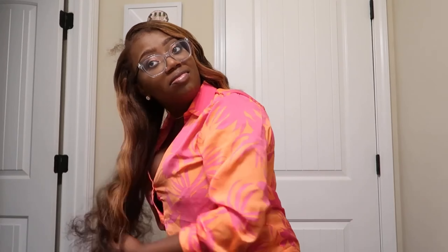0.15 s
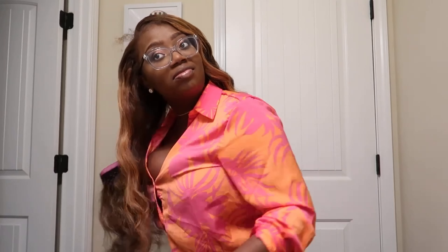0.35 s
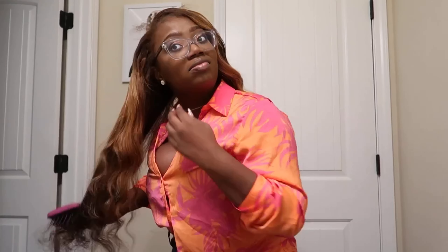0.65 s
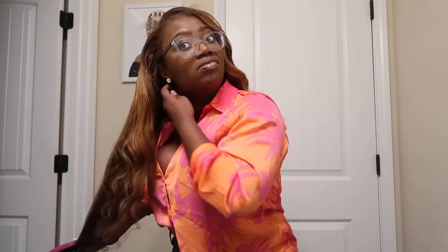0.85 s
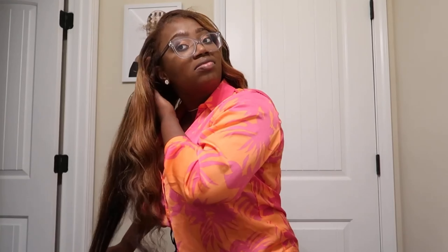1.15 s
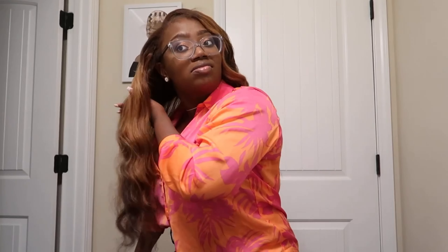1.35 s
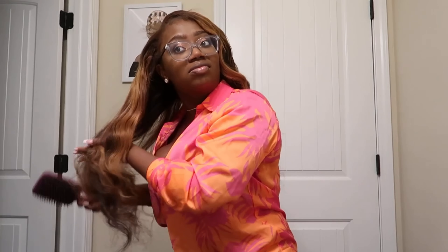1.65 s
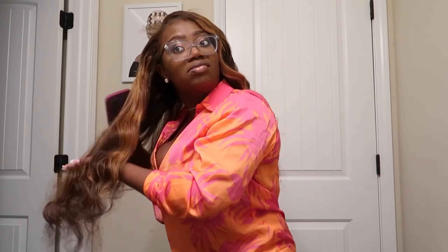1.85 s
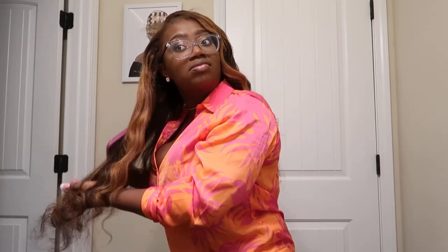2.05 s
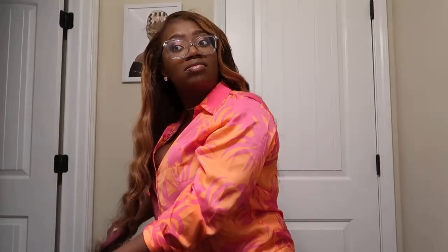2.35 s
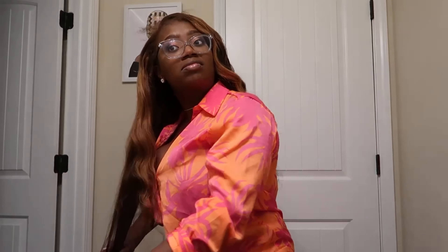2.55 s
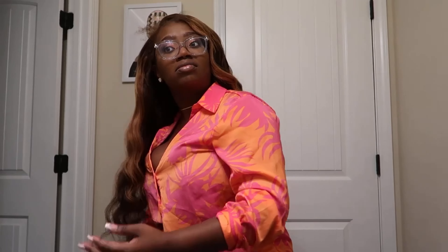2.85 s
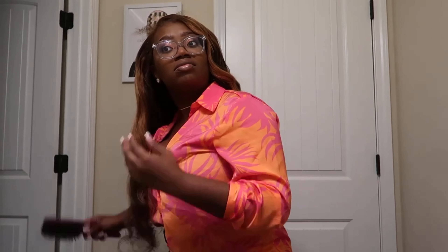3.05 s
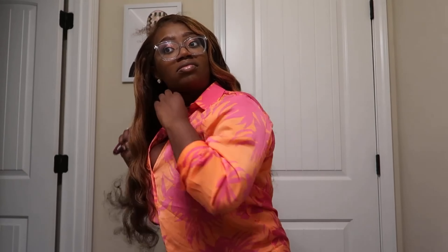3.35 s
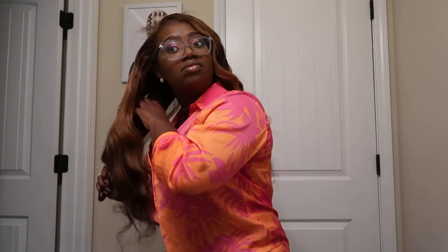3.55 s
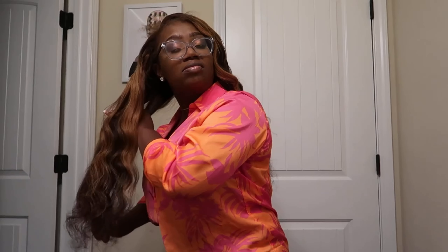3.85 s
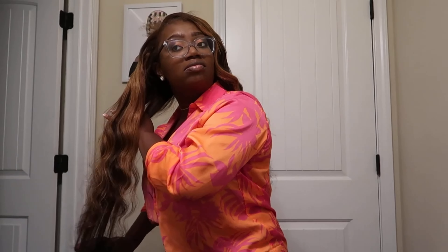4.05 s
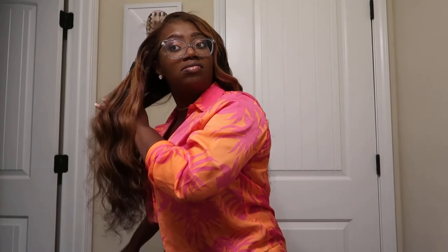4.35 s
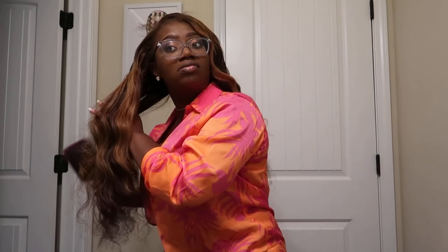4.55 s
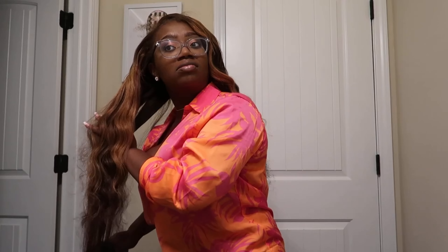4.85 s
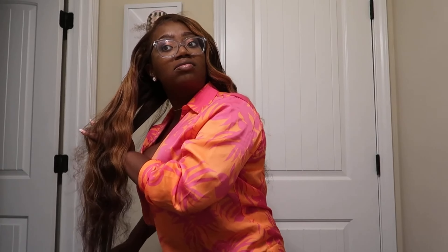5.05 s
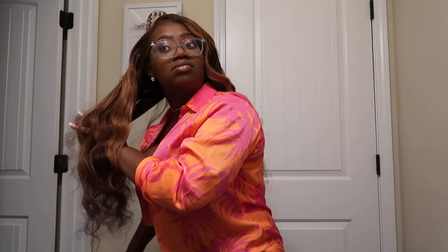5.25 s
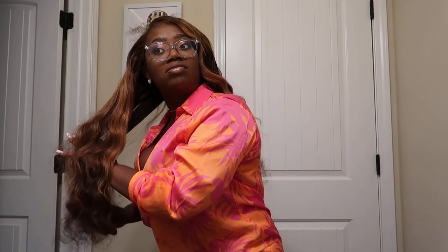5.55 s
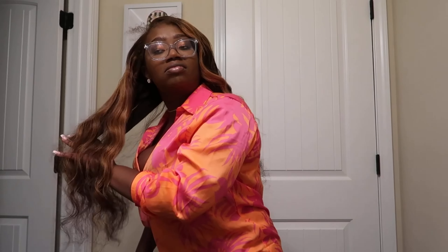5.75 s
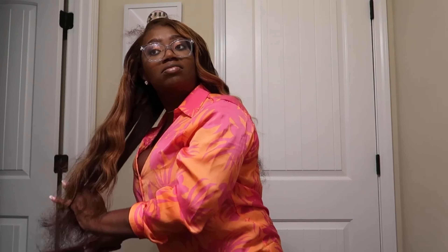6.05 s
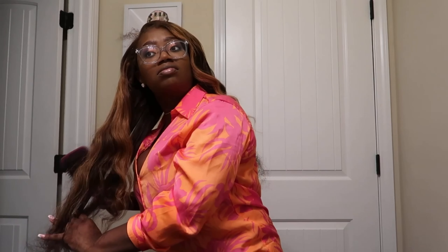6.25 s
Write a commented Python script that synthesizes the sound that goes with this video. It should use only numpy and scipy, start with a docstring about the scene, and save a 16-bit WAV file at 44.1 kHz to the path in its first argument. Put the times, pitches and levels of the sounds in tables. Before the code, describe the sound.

A small, quiet indoor room with low rumble and faint hiss, miked fairly close. At 0.0 s a paddle brush slides through long hair for about 0.7 s: a soft hollow rub, slightly sinking in pitch, under fine dry rasp. Small snags tick at 0.55-0.8 s, then light rustling. At 1.1-1.4 s tangles catch, with a loud, thumpy, crunchy knock at 1.3 s and sharp bristle flicks. Faint rustles lead to a softer stroke at 1.9-2.5 s, ending in a run of woody clacks and scratches until 2.85 s. After a quiet pause, a third gentle stroke starts at 3.35 s and breaks into hollow knocks at 3.9-4.25 s. A shorter fourth pull at 4.7 s snags repeatedly, peaking at 5.15 s with a hard knock, bright tip swish and tiny hair cracks. Brief soft brush touches at 5.6 and 6.35 s, with slight rustles, finish it.

```python
"""Over low room rumble and faint hiss, a paddle brush is pulled through long hair in a small quiet room.
Strands slip over the bristles with a fine rasp and stir a hollow ring and the brush's soft cushion.
During and after the four main strokes the brush snags: bristles flick back, tangles knock in decaying
resonances, and at times the tips swish. Light rustles fill the pauses, and two brief touches of the
brush close the scene."""
import sys
import numpy as np
from scipy import signal
from scipy.fft import rfft, irfft
from scipy.io import wavfile

SR = 44100
rng = np.random.default_rng(int(sys.argv[2]) if len(sys.argv) > 2 else 0)


def put_to_file(sound):
    """Save the sound as 16-bit audio at rate SR, in the file named by the first command-line argument."""
    columns = np.atleast_2d(sound).T  # one column per channel
    safe = np.clip(columns, -1, 1)
    whole_steps = np.round(safe * 32767)
    wavfile.write(sys.argv[1], SR, whole_steps.astype(np.int16))


N = 282240
HZ = np.fft.rfftfreq(N, 1 / SR)
T = np.arange(N) / SR

# Still air of the room and microphone hiss. Each row: frequency in Hz, relative density in dB per Hz.
AIR_SPECTRUM = [(15, -20), (38, -1.5), (60, -7), (115, 3), (180, -7.5), (280, -6), (450, -11.5), (750, -16),
                (1500, -21), (4000, -26.5), (8000, -34.5), (11500, -36.5), (13500, -41), (15500, -52)]
# Likeness of the air on the two sides. Each row: frequency in Hz, left-right likeness (clipped to -1..1).
AIR_LIKENESS = [(60, 1), (130, 0.96), (290, -0.12), (640, -0.38), (8000, 0.23), (13000, -1.23)]
AIR_DB = -50  # rms over both sides

# Strokes down the hair. Each row: start in s, length in s, time to sink in in s, hollow ring in dB,
# hair's rasp in dB, easing once sunk in in dB, cushion's share of the power 0-1 (before it fades).
BRUSH_STROKES = [(0.029, 0.68, 0.096, -39.5, -49, 5.5, 0.76), (1.879, 0.64, 0.19, -45, -53, 0, 0.9),
                 (3.346, 0.68, 0.077, -44, -53, -0.5, 0.57), (4.696, 0.37, 0.021, -41.5, -50.5, 8, 0.1),
                 (5.565, 0.073, 0.083, -38.5, -49.5, 0, 0.7), (6.36, .1, 0.019, -46, -56, 1, 0.06)]
# The pull holds, eases as the hair straightens, and ends as the brush lifts.
EASE_AFTER_S, EASE_S, LIFT_S = 0.12, 0.17, 0.067
# The cushion's hollow rub sinks in pitch and fades along each stroke.
CUSHION_HZ, SINK_OCT_PER_S, CUSHION_FADE_S = 479, 0.31, 0.78
RASP_SLOWER = 1.19  # the rasp builds this many times longer than the ring, as more strands enter
# Bristles catching in a tangle and tearing through. Each row: start in s, length in s,
# hollow ring in dB, hair's rasp in dB, extra thump in dB, extra clack in dB.
TANGLE_SNAGS = [(0.556, 0.053, -40.5, -49, 1, -2), (0.704, 0.046, -33.5, -45, -8, 0.5),
                (0.763, 0.054, -46, -47, 11, -0.5), (1.086, 0.037, -46.5, -52.5, -5, 4.5),
                (1.16, 0.06, -33.5, -38.5, 2, 3), (1.245, 0.032, -46, -44, 2, -13),
                (1.285, 0.031, -29.5, -30.5, 12.5, 8), (1.32, 0.036, -42.5, -45.5, 6, 9),
                (2.122, 0.11, -45.5, -52.5, -5, 2.5), (2.588, 0.028, -41.5, -42.5, 7, 8),
                (2.635, 0.056, -42.5, -41, 2, 3), (2.7, 0.051, -39, -41, -5, -2),
                (2.779, 0.03, -34, -32.5, -14, 7), (2.811, 0.021, -35.5, -34, 0, 9),
                (2.836, 0.042, -49, -42.5, 11, 8), (3.867, 0.038, -37, -54, -2, -8.5),
                (3.979, 0.055, -32.5, -45.5, -9, -5), (4.032, 0.031, -31.5, -37, 1, 1),
                (4.138, 0.052, -29, -39, 2.5, 1.5), (4.174, 0.047, -28, -33.5, -1.5, 4),
                (4.702, 0.03, -37, -55, -11, -1), (4.859, 0.069, -39.5, -41.5, 4, 2),
                (4.946, 0.033, -33.5, -38.5, 3, 3.5), (5.005, 0.026, -36.5, -44, -10, 7),
                (5.058, 0.026, -42.5, -43.5, 6, 12.5), (5.129, 0.047, -27, -34.5, -6, 3)]
CATCH_S, LET_GO_S = 0.0098, 0.0076  # rise and dying away of a snag
# Hair gathered and shifted lightly between strokes. Each row: start in s, length in s,
# dull rustle in dB, rasp in dB.
HAIR_RUSTLES = [(.82, 0.3, -54.5, -56.5), (1.42, 0.09, -54, -63), (1.55, 0.18, -81, -58),
                (2.93, 0.11, -57, -78), (5.66, 0.038, -59, -49), (6.19, 0.094, -55.5, -60)]
RUSTLE_RISE_S, RUSTLE_FADE_S = 0.021, 0.013
# The hair never lies quite still. One row: dull rustle in dB, rasp in dB (before the friction dies away).
IDLE_HAIR_DB = [-59, -62]

# Resonances of the knocks and strokes, coloured by paddle and a close wall together.
# Each row: frequency in Hz, width in Hz, relative strength in dB.
BODY_MODES = [(153, 29, -5.5), (228.4, 22.3, 1.5), (299.3, 18.7, -3), (372.5, 34, 0.5), (401.6, 39, 0.5),
              (465.5, 25, -1.5), (507.2, 33.4, -5), (573, 59, -9.5), (674, 36, -5.5), (745.4, 18.5, -2.5),
              (826, 26, -9.5), (883, 21.5, -10), (952, 77, -14), (1048, 30, -17.5), (1165, 78, -25),
              (1340, 30, -20.5), (1472, 14, -25.5)]
# Hair sliding over bristles. Each row: frequency in Hz, relative density in dB per Hz.
RASP_SPECTRUM = [(150, 7), (500, 6.5), (1000, 3.5), (1600, 1), (2400, 2.5), (3700, -1.5), (4600, -5),
                 (5600, -4.5), (7000, -12), (9000, -15), (11500, -12.5), (13500, -44)]
# Silky hiss of strand on strand. Each row: frequency in Hz, relative density in dB per Hz.
SILK_SPECTRUM = [(2000, -22), (4500, -7), (6000, -5), (7500, -9), (9000, -6), (11600, 0), (13000, -5),
                 (15000, -12)]

# Single bristles flicking back. Each row: start in s, relative peak in dB.
BRISTLE_FLICKS = [(.184, -29), (.5761, -38), (.675, -32.5), (.7143, -29), (1.088, -41), (1.156, -34),
                  (1.1707, -31), (1.18, -35), (1.2825, -19.5), (1.2955, -27), (1.301, -22.5), (2.0098, -39),
                  (2.593, -33), (2.632, -42), (2.7025, -30), (2.7931, -25), (2.81, -17), (3.9935, -29),
                  (4.0244, -23), (4.038, -26), (4.14, -31), (4.148, -24), (4.158, -25), (4.1675, -20),
                  (4.221, -27), (4.8765, -29), (4.891, -30), (4.9005, -23), (4.953, -32), (4.964, -39),
                  (5.022, -42), (5.0615, -27), (5.1387, -40)]
# Snap of one bristle. Each row: frequency in Hz, relative density in dB per Hz.
SNAP_SPECTRUM = [(200, -39), (1200, 13), (2400, 17.5), (3600, 11.5), (4700, -21), (8000, -2), (12000, -30),
                 (15000, -23)]
# Single hairs breaking with a tiny bright crack. Each row: start in s, peak in dB.
HAIR_BREAKS = [(4.024, -29), (5.138, -22), (5.149, -17)]
# Knocks as tangles let go, some followed closely by their echo off a wall. Each row: start in s,
# relative peak in dB, low thump over the ring in dB, hard clack over the ring in dB,
# favoured frequency in Hz.
KNOCK_EVENTS = [(.67, -24.5, 1, -15, 398), (.713, -27.5, 6, -3, 706), (1.151, -25, -5, 0, 895),
                (1.167, -22, 1, 4.5, 302), (1.293, -8.5, 12.5, 6, 150), (1.307, -7.5, 9.5, 4, 400),
                (1.343, -26, 8, 10, 302), (1.359, -24, 10, 0, 640), (1.371, -22, 13, 6, 160),
                (2.551, -26.5, -6, -4, 390), (2.590, -23, 0, -8, 400), (2.631, -17.5, 3, 3, 400),
                (2.644, -15, 12, 15, 825), (2.702, -12, 0, -17, 400), (2.716, -13.5, 4, 0.5, 805),
                (2.766, -15, 0, 1.5, 400), (2.786, -18.5, 4, -2, 394), (4.035, -20, -20, 1, 620),
                (4.15, -31, -3, 7, 745), (4.181, -13.5, -7, -14, 400), (4.209, -17, -4, 10, 940),
                (4.785, -24, -12, -20, 394), (4.897, -13, -16, -13, 515), (4.914, -22.5, 18, -2, 159),
                (5.008, -18.5, -4, -12, 413), (5.134, -31, -14, 9, 520), (5.147, -7.5, -6, -4.5, 443)]
# Tips of the hair whipping off the bristles. Each row: start in s, length in s, level in dB.
TIP_WHISKS = [(0.713, 0.047, -50), (2.72, 0.042, -50), (5.063, 0.023, -43), (5.136, 0.039, -36)]
# Colour of that swish. Each row: frequency in Hz, relative density in dB per Hz.
WHISK_SPECTRUM = [(1000, -31), (2600, -12), (3900, 10), (5400, 4), (7000, -13), (9000, -8), (12000, -6),
                  (15000, -21)]

# Reverberation time. Each row: frequency in Hz, time to fall by 60 dB in s.
ROOM_DECAY = [(100, 0.19), (400, 0.32), (1000, 0.37), (4000, 0.33), (12000, 0.26)]
# The two microphone ports. Each row: frequency in Hz, likeness 0-1, phase lead of the left in radians.
PORT_COHERENCE = [(100, .99, 0), (750, .985, .03), (1300, .9, .05), (2400, .91, .15), (3500, .74, .35),
                  (4500, .45, .8), (5800, .45, 2.0), (7700, .35, 1.5), (8800, .72, 3.0), (10200, .7, 3.0),
                  (12500, .98, 3.1)]
EDGE_HZ = 15300  # upper band limit of the recorder


def amp(db):
    """Decibels express a logarithmic amplitude ratio; this returns the ratio itself."""
    return 10 ** (np.asarray(db) / 20)


def read(points, hz, axis=1):
    """Interpolation: one column of a table, joined by straight lines over log frequency."""
    points = np.array(points, float)
    return np.interp(np.log(hz + 1), np.log(points[:, 0] + 1), points[:, axis])


def unit(x):
    """Normalization: scales a signal to rms 1."""
    return x / np.sqrt(np.mean(x ** 2) + 1e-20)


def add(mix, s, sound):
    """Superposition: lays a sound into the mix at s seconds."""
    part = mix[max(round(s * SR), 0):][:len(sound)]
    part += sound[:len(part)]


def colour(x, spectrum):
    """Minimum-phase filtering: folding the cepstrum makes the given spectrum causal."""
    cepstrum = irfft(np.log(amp(read(spectrum, HZ))), N)
    cepstrum[1:N // 2] *= 2
    cepstrum[N // 2 + 1:] = 0
    return irfft(rfft(x, N) * np.exp(rfft(cepstrum)), N)


def wander(hz):
    """Low-pass noise: slow chance of rms 1, up to about hz changes a second."""
    slow = rfft(rng.standard_normal(N)) / np.sqrt(1 + (HZ / hz) ** 4)
    return unit(irfft(slow, N))


def resonate(x, hz, width):
    """Swept resonance: shifts the curve hz to zero, smooths with a one-pole filter and shifts back."""
    turn = np.exp(2j * np.pi * np.cumsum(hz) / SR)
    r = np.exp(-np.pi * width / SR)
    return 2 * (turn * signal.lfilter([1 - r], [1, -r], x / turn)).real


def swell(start, length, rise_s, fade_s):
    """Envelope: rises smoothly, holds for the rest of the length and decays exponentially."""
    age = T - start
    rise = np.sin(np.pi / 2 * np.clip(age / rise_s, 0, 1)) ** 2
    return rise * np.exp(-np.clip((age - length) / fade_s, 0, 20))


def air():
    """Partial coherence: low room rumble common to both sides, under a faint hiss that is not."""
    left, other = rfft(rng.standard_normal((2, N)))
    same = np.clip(read(AIR_LIKENESS, HZ), -1, 1)
    right = same * left + np.sqrt(1 - same ** 2) * other
    pair = np.array([left, right]) * amp(read(AIR_SPECTRUM, HZ))
    return amp(AIR_DB) * unit(irfft(pair, N))


def pull():
    """Addition of powers: idle hair, strokes, snags and rustles sum to the ring and rasp levels in dB.

    Also returns the cushion's pitch in Hz and its share of the power.
    """
    ring, rasp = amp(IDLE_HAIR_DB)[:, None] ** 2 * np.ones(N)
    cushion, hz = np.zeros(N), np.full(N, float(CUSHION_HZ))
    for start, length, sink_s, ring_db, rasp_db, ease_db, share in BRUSH_STROKES:
        age = np.clip(T - start, 0, length)
        easing = 1 - np.exp(-np.maximum(age - sink_s - EASE_AFTER_S, 0) / EASE_S)
        eased = amp(-ease_db * easing)
        power = (amp(ring_db) * eased * swell(start, length, sink_s, LIFT_S)) ** 2
        ring = ring + power
        rasp_gain = swell(start, length, sink_s * RASP_SLOWER, LIFT_S)
        rasp = rasp + (amp(rasp_db) * eased * rasp_gain) ** 2
        cushion = cushion + power * share * np.exp(-age / CUSHION_FADE_S)
        hz = np.where(T < start, hz, CUSHION_HZ * 2 ** (-SINK_OCT_PER_S * age))
    snags = (TANGLE_SNAGS, CATCH_S, LET_GO_S)
    rustles = (HAIR_RUSTLES, RUSTLE_RISE_S, RUSTLE_FADE_S)
    for events, rise_s, fade_s in (snags, rustles):
        for start, length, ring_db, rasp_db, *_ in events:
            power = swell(start, length, rise_s, fade_s) ** 2
            ring = ring + amp(ring_db) ** 2 * power
            rasp = rasp + amp(rasp_db) ** 2 * power
    return 10 * np.log10(ring), 10 * np.log10(rasp), hz, np.clip(cushion / ring, 0, 1)


def grip():
    """Point of excitation: each snag tugs another part, lifting thump and clack by its own dB."""
    return sum(np.outer([thump_db, clack_db], swell(start, length, CATCH_S, LET_GO_S))
               for start, length, _, _, thump_db, clack_db in TANGLE_SNAGS)


def slips(per_s, spread_db, smooth):
    """Stick-slip friction: clicks of uneven size and either sign over a smooth slide."""
    size = amp(spread_db * np.minimum(rng.exponential(1, N), 3))
    clicks = size * rng.choice([-1, 1], N) * (rng.random(N) < per_s / SR)
    return unit(unit(clicks) + smooth * rng.standard_normal(N))


def mode(hz, width, db, size=11025):
    """Impulse response of one resonance: a sine whose decay rate is pi times its width."""
    t = T[:size]
    return amp(db) * width * np.exp(-np.pi * width * t) * np.sin(2 * np.pi * hz * t)


def body_ring(count=(3, 8), lowest_hz=105, order=4):
    """Modal sum: paddle and close wall together colour a low thump, a middle ring and a high clack."""
    modes = np.array([mode(*row) * (-1) ** k for k, row in enumerate(BODY_MODES)])
    bass_cut = signal.butter(order, lowest_hz, "high", fs=SR, output="sos")
    modes = signal.sosfilt(bass_cut, modes)  # too small to radiate deep bass
    return [group.sum(0) for group in np.split(modes, count)]


def contact(level_db, rest_db):
    """Friction needs contact: its gain falls away faster below the resting level."""
    return amp(level_db) / np.sqrt(1 + amp(rest_db - level_db) ** 4)


def bristles(per_s=14, spread_db=4.0, cycles=1.5, low_hz=1100, high_hz=5500, count=28, size=400):
    """Damped free vibration: randomly plucked bristles of many stiffnesses, damped to a dry scratch."""
    t, out = T[:size], np.zeros(N)
    for hz in np.geomspace(low_hz, high_hz, count):
        plucks = np.zeros(N)
        at = rng.integers(0, N, round(per_s * N / SR))
        plucks[at] = amp(spread_db * np.minimum(rng.exponential(1, len(at)), 3))
        answer = hz * np.sin(2 * np.pi * hz * t) * np.exp(-t * hz / cycles)
        out += signal.oaconvolve(plucks, answer)[:N]
    return unit(out)


def silk(rasp_level):
    """Saturating friction: a fine hiss that sets in as the hair slides and then levels off."""
    sliding = 1 / np.sqrt(1 + amp(-52.5 - rasp_level) ** 4)
    return amp(-54.5) * sliding * unit(colour(rng.standard_normal(N), SILK_SPECTRUM))


def stroke(ring_level, rasp_level, hz, soft, thump_lift, clack_lift, thump_db=-5.5, thump_growth=0.011,
           tug_db=-33, judder_db=0.5, judder_hz=30, catch_db=1.8, catch_hz=110, cushion_width=190,
           pluck_db=-3, pluck_growth=0.099):
    """Forced vibration: slipping hair rasps and drives the hollow ring, beside the soft cushion's rub."""
    judder = amp(judder_db * wander(judder_hz))  # rows of bristles catch and let go together
    pushes = slips(per_s=2200, spread_db=1.0, smooth=0.8)
    thump, ring, clack = (signal.oaconvolve(pushes, part)[:N] for part in body_ring())
    thump = thump * amp(thump_db + thump_lift + thump_growth * (ring_level - tug_db))
    hollow = (ring + thump + clack * amp(clack_lift)) / np.std(ring + clack)
    rub = resonate(rng.standard_normal(N), hz, cushion_width)
    cushion = unit(resonate(rub, hz, cushion_width))
    body = np.sqrt(1 - soft) * hollow + np.sqrt(soft) * cushion
    body = body * contact(ring_level, rest_db=-57.5)

    # a hard pull bends more bristles than a glide
    plucked = amp(pluck_db + pluck_growth * (rasp_level - tug_db))
    scrape = slips(per_s=2500, spread_db=3.0, smooth=0.71) + plucked * bristles()
    scrape = scrape * amp(catch_db * wander(catch_hz))  # strands slip in small bunches
    rasp = unit(colour(scrape, RASP_SPECTRUM)) * contact(rasp_level, rest_db=-62.0)
    return judder * (body + rasp + silk(rasp_level))


def ticks(events, spectrum, level_db, decay_s, scrape=.11, size=1500):
    """Impulsive release: each event is a sharp snap of the given colour, trailed by a brief scrape."""
    out = np.zeros(N)
    snap = colour(np.ones(1), spectrum)[:size]
    for s, db in events:
        release = scrape * rng.standard_normal(size) * np.exp(-T[:size] / decay_s)
        release[0] = 1
        tick = signal.fftconvolve(release, snap)
        add(out, s, amp(db + level_db) * tick / abs(tick).max())
    return out


def flicks():
    """Elastic recoil: single bristles spring back with a snap."""
    return ticks(BRISTLE_FLICKS, SNAP_SPECTRUM, level_db=2, decay_s=0.0016)


def knocks(crunch_db=-21, crunch_s=0.0031, level_db=-3, spot_db=4, spot_width=90):
    """Impulse excitation: tangles let go, some with a close wall echo, in a ring and a brief rattle."""
    out = np.zeros(N)
    thump, ring, clack = map(unit, body_ring())
    t = T[:len(ring)]
    rattle = unit(colour(slips(per_s=1200, spread_db=6, smooth=.3), RASP_SPECTRUM))
    for s, db, thump_db, clack_db, spot_hz in KNOCK_EVENTS:
        blow = ring + thump * amp(thump_db) + clack * amp(clack_db)
        blow = blow + amp(spot_db) * resonate(blow, np.full(len(t), spot_hz), spot_width)
        burst = t / crunch_s * np.exp(1 - t / crunch_s)
        crunch = rattle[round(s * SR):][:len(t)] * burst
        add(out, s, amp(db + level_db) * (blow / abs(blow).max() + amp(crunch_db) * crunch))
    return out


def whisks(rise_s=0.021, fade_s=0.0074):
    """Dense small slips merge into noise: the fine tips sweep off the bristles with a bright swish."""
    gain = sum(amp(db) * swell(start, length, rise_s, fade_s) for start, length, db in TIP_WHISKS)
    return gain * unit(colour(slips(per_s=4000, spread_db=3, smooth=.8), WHISK_SPECTRUM))


def breaks():
    """Sudden fracture: single hairs part with a bright crack."""
    return ticks(HAIR_BREAKS, SILK_SPECTRUM, level_db=0, decay_s=.002, scrape=1)


def reflections(size=22050, count=22):
    """Reverberant decay: sparse reflections off close walls and doors die within half a second."""
    taps = np.zeros(size)
    at = np.arange(round(.005 * SR), size - count, count)
    taps[at + rng.integers(0, count, len(at))] = rng.choice([-1., 1.], len(at))
    hz, t, z = signal.stft(taps, SR, nperseg=256)
    decay = amp(-60 * t / read(ROOM_DECAY, hz)[:, None])
    tail = signal.istft(z * decay, SR, nperseg=256)[1]
    return tail / np.linalg.norm(tail)


def room(x, wet_db=-1.5, turns_per_s=1.7, count=3):
    """Diffuse room: sets of reflections fade into one another in turn, so no colour stays fixed."""
    wet = 0
    for k in range(count):
        share = np.sqrt(2 / count) * np.cos(2 * np.pi * turns_per_s * T + np.pi * k / count)
        wet = wet + signal.oaconvolve(x * share, reflections())[:N]
    return (x + amp(wet_db) * wet) / np.sqrt(1 + amp(wet_db) ** 2)


def brush(effort):
    """Superposition of sources: everything the brush sends into the room along one path."""
    return room(stroke(*effort) + flicks() + knocks() + whisks() + breaks())


def ports(near, scattered, left_db=0.21):
    """Spatial coherence: bass is alike at both ports, middle treble scattered, the top out of step."""
    same = np.clip(read(PORT_COHERENCE, HZ), 0, 1)
    lag = np.exp(-1j * read(PORT_COHERENCE, HZ, axis=2))
    right = same * lag * rfft(near) + 1j * np.sqrt(1 - same ** 2) * rfft(scattered)
    return np.array([near * amp(left_db), irfft(right, N) * amp(-left_db)])


def scene():
    """Superposition at the ports: the brush in the room, over still air."""
    effort = (*pull(), *grip())
    return ports(brush(effort), brush(effort)) + air()


def record(dry):
    """Band limitation: a linear-phase low-pass sets the recorder's upper edge."""
    low_pass = signal.firwin(511, EDGE_HZ, window=("kaiser", 9), fs=SR)
    return signal.oaconvolve(dry, low_pass[None], "same")


dry = scene()
out = record(dry)
put_to_file(out)
```